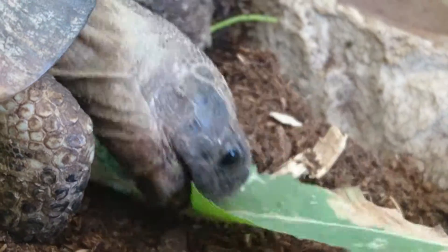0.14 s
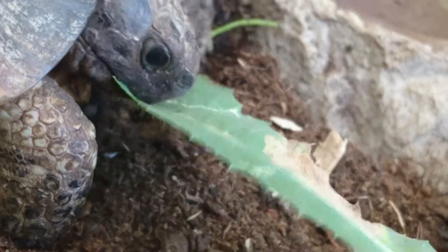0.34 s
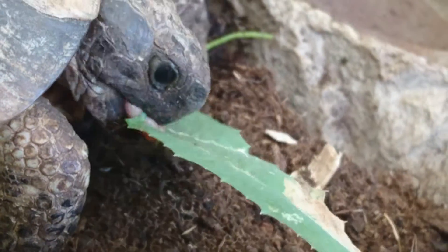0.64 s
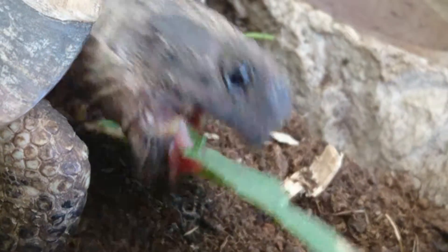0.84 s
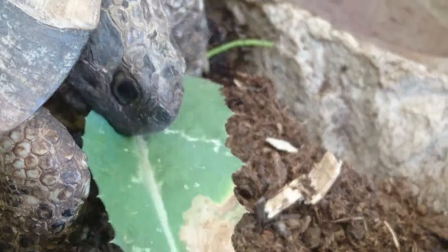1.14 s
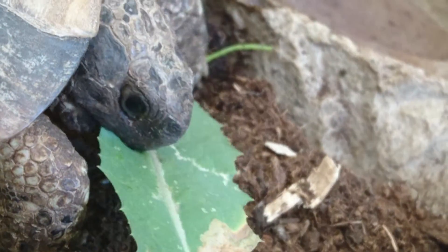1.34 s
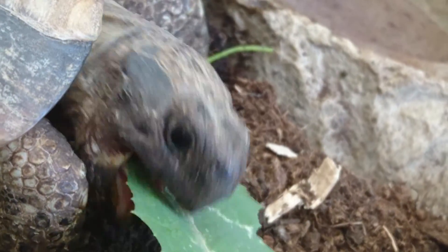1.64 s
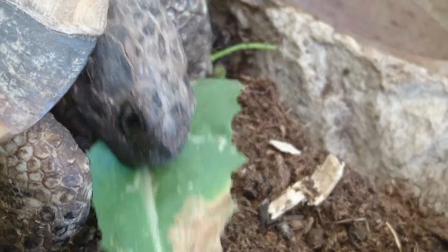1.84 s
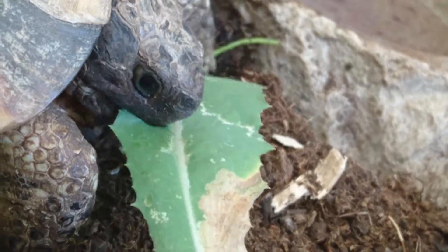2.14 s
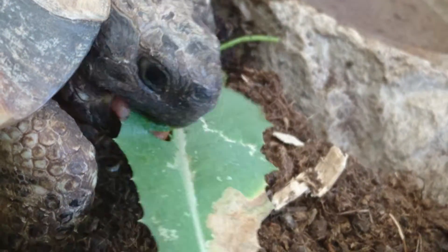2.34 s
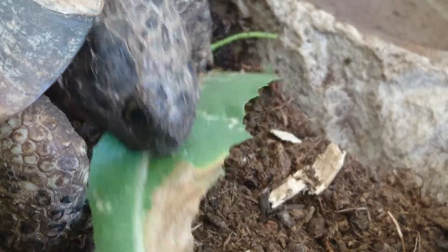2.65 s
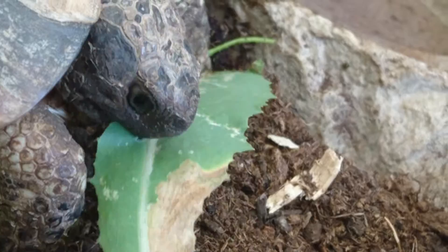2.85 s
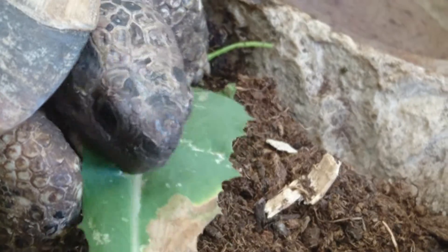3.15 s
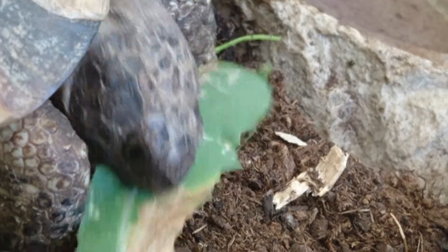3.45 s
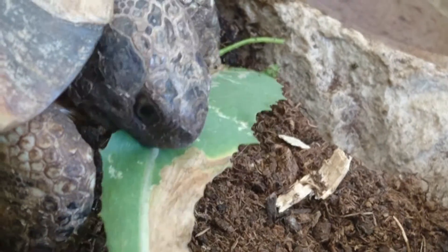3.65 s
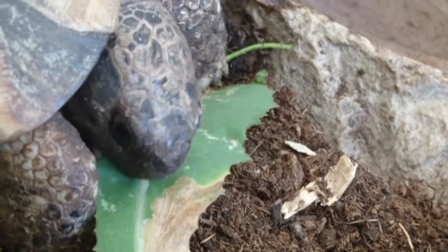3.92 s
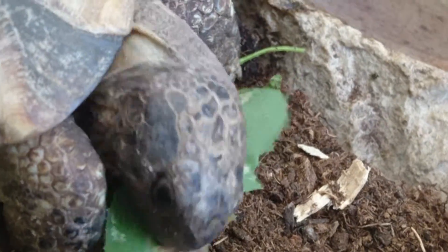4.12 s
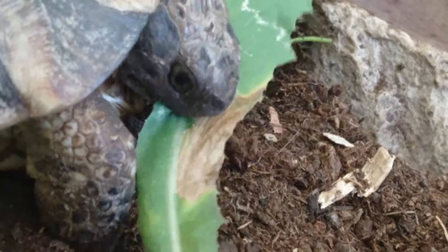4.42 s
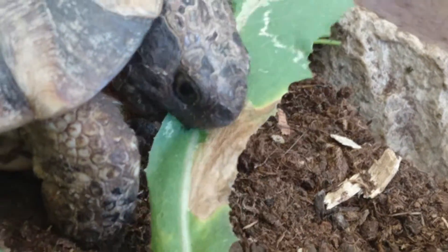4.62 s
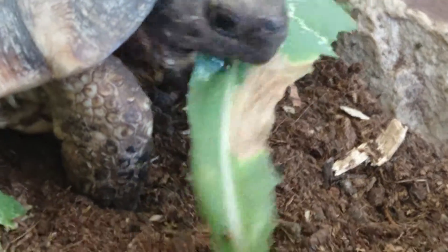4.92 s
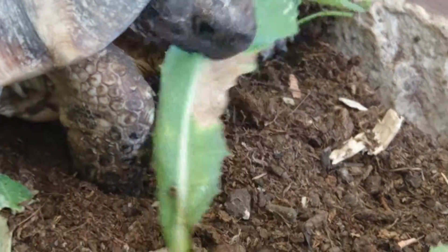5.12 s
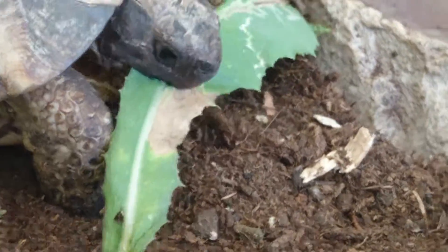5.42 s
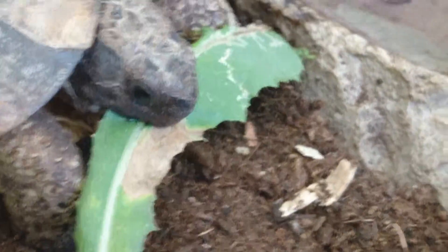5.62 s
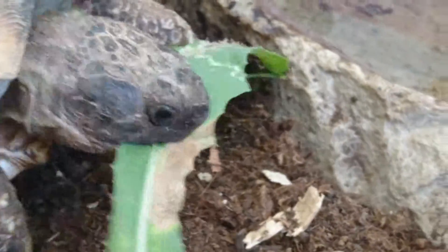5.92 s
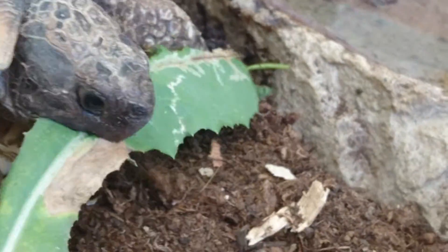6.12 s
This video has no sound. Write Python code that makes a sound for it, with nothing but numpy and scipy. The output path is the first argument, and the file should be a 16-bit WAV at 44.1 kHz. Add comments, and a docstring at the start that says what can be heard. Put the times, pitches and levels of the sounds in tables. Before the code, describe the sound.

A tortoise bites and tears a fresh leaf up close, with crisp sharp snaps and short wet-crisp rips over a soft low rumble.

```python
"""Tortoise eating a leaf

A tortoise bites and tugs at a fresh leaf, close to a small stereo microphone in a quiet room.
Veins snap as sharp clicks with dull jaw knocks; the blade tears as runs of tiny random bursts.
Shaped noise makes the low rumble, drone, hiss and dull scuffs behind it. Sine tones make a hum that
fades, a far engine that rises and sinks, and faint falling bird notes."""
import sys
import numpy as np
from scipy import signal
from scipy.fft import rfft, irfft
from scipy.io import wavfile
from scipy.ndimage import uniform_filter1d

SR = 44100
rng = np.random.default_rng(int(sys.argv[2]) if len(sys.argv) > 2 else 0)


def digitize_waveform(pressure):
    """Quantize a signal to 16-bit integers and store it at the path in sys.argv[1].

    Rows of a 2-D input are taken as channels; values are limited to [-1, 1].
    """
    field = np.atleast_2d(pressure).T
    bounded = np.clip(field, -1, 1)
    quanta = np.round(bounded * 32767).astype(np.int16)
    wavfile.write(sys.argv[1], SR, quanta)


N = 276507
TIME = np.arange(N) / SR  # seconds
HZ = np.fft.rfftfreq(N, 1 / SR)

# Levels here come before the final balance between the sounds; spectrum levels are only relative.
# The veins that break loudest. Each row: start in seconds, level in dB, brightness in dB,
# ring of the stiff piece in Hz, knock of the jaw in dB relative to the level.
VEIN_SNAPS = [(0.1459, -51, 4, 9100, -25), (0.2412, -47.5, 9, 4200, -31), (0.3086, -41.5, 29, 11900, -42),
              (0.7147, -54.5, -7, 5600, -18), (0.9597, -53.5, 18, 9700, -34), (1.062, -44.5, 6, 10000, -41),
              (1.097, -53, 0, 6400, -34), (1.1148, -45, -1, 6200, -37), (1.54, -50.5, 3, 11500, -30),
              (1.8117, -46.5, -6, 4500, -37), (1.8416, -42.5, -3.5, 11300, -26),
              (2.017, -53.5, -10, 9000, -36), (2.3491, -57.5, 5, 9300, -27), (2.625, -47, -4, 9100, -33),
              (2.6507, -45, 1, 9300, -29), (2.6548, -42.5, -4, 9000, -31), (2.7056, -43, -3, 7000, -39),
              (2.921, -52, -3, 5560, -25), (3.0308, -44, -10, 8800, -31), (3.094, -47, -4, 4930, -32),
              (3.282, -47, 1, 4770, -32), (3.4913, -45, 3, 11050, -41), (3.498, -33.5, 0.5, 5900, -48),
              (3.5206, -43, 2, 10700, -25), (3.6062, -44.5, 0, 11500, -45), (3.916, -48.5, -3, 7060, -36),
              (3.9673, -51, -4, 4400, -34), (4.282, -42, 21, 10700, -38), (4.3011, -39.5, 2, 11000, -31),
              (4.313, -36.5, -3, 6300, -31), (4.3678, -42.5, 3, 7500, -42), (5.0916, -41.5, 21, 10100, -41),
              (5.1413, -46, 11, 8850, -36), (5.1946, -27.5, 7, 5780, -29), (5.2108, -43, -2, 10100, -24),
              (5.2559, -41.5, 4, 6700, -26), (5.27, -47.5, -1, 9700, -39), (6.004, -44, 0, 3600, -20.5),
              (6.0224, -47, 7, 8800, -32), (6.0424, -44.5, 2, 4756, -21), (6.094, -51.5, 3, 8450, -31),
              (6.238, -50.5, -1, 12680, -35)]
# Pulls of the jaw that tear or rub the blade. Each row: start in seconds, length in seconds,
# level in dB, brightness in dB, ring of the taut piece in Hz.
BLADE_TEARS = [(0.073, 0.071, -62, -4, 4850), (0.226, .125, -56, -3.5, 3900), (0.713, .014, -62, 1, 5600),
               (0.779, 0.011, -60, -4, 6800), (1.056, 0.0073, -52.5, -5, 10200),
               (1.116, 0.046, -57.5, -7, 5850), (1.81, 0.024, -59, -4, 11400),
               (1.911, 0.02, -52, -5, 11600), (2.654, 0.016, -49, -1, 9050),
               (2.712, 0.032, -51.5, -5, 6200), (3.013, 0.11, -61.5, -8, 4370),
               (3.124, 0.13, -59, -2, 9500), (3.478, 0.093, -49, 0, 10900), (3.903, .016, -60.5, -13, 7100),
               (3.967, 0.03, -53, -2, 6140), (4.032, 0.069, -65.5, -11, 6540),
               (4.281, .06, -50.5, -2.5, 10800), (4.35, 0.075, -53.5, -4, 11400),
               (4.777, 0.042, -64.5, -17, 3540), (5.081, 0.11, -53.5, 4, 9360),
               (5.187, 0.031, -51, -1, 5460), (5.24, 0.032, -58.5, -6, 9200),
               (5.307, 0.082, -63.5, -5, 9250), (5.992, 0.018, -50, -3, 8800), (6.09, 0.038, -56, -1, 8400)]
# Sound colour of the leaf. Each row: frequency in Hz, level in dB per Hz.
LEAF_SPECTRUM = [(300, -33.5), (1200, -24.5), (2200, -14.5), (2900, -15.5), (3500, -9), (4600, -4),
                 (6000, -3), (7700, -4.5), (8800, 3), (10700, -6), (11700, -4.5), (13000, -3), (16000, -8)]
# Sound colour of the jaw. Each row: frequency in Hz, level in dB per Hz.
JAW_SPECTRUM = [(200, -10), (600, -17), (900, -3.5), (1400, -0.5), (2200, -7), (4000, -34), (16000, -22)]
# Faint dull scuffs. Each row: start in seconds, length in seconds, rough centre in Hz, level in dB.
SCUFF_EVENTS = [(0.71, 0.15, 830, -79), (2.383, .13, 620, -73), (2.861, 0.097, 560, -70),
                (3.53, 0.038, 1120, -76), (4.638, 0.043, 1800, -76), (5.725, 0.017, 2046, -74)]
# Bird notes. Each row: start in seconds, length in seconds, starting pitch in Hz, level in dB.
BIRD_NOTES = [(1.39, 0.093, 3190, -84), (1.77, 0.089, 3430, -79), (1.947, 0.052, 3260, -83),
              (2.135, 0.13, 3430, -81), (2.33, 0.027, 3900, -76)]
# Far engine revving up and running down. Each row: time in seconds, firing rate in Hz, level in dB.
ENGINE_COURSE = [(4.33, 46, -81), (4.48, 50.4, -63), (4.62, 56, -48), (4.76, 60.58, -66.5),
                 (5.08, 63.4, -60), (5.22, 61.93, -61.5), (5.33, 59.7, -51), (5.62, 51.41, -49),
                 (5.78, 47.14, -52.5), (6.02, 39.5, -52.5), (6.27, 38.95, -51)]
# Sound colour of the rumble. Each row: frequency in Hz, level in dB per Hz.
RUMBLE_SPECTRUM = [(20, -66), (36, -20), (48, -4), (60, 2), (76, 1.5), (92, -15.5), (125, -17.5),
                   (300, -65.5), (16000, -100)]
# Slow swell of the rumble. Each row: time in seconds, level in dB.
RUMBLE_SWELL = [(0, -46.5), (.5, -50.5), (1.1, -58), (2.1, -59), (2.8, -52), (3.6, -56.5), (4.2, -52),
                (4.9, -50), (6.27, -48)]
# Sound colour of the room's low drone. Each row: frequency in Hz, level in dB per Hz.
DRONE_SPECTRUM = [(40, -38), (90, 7), (150, 1.5), (210, -4), (285, -3), (370, -10.5), (520, -15),
                  (700, -21), (1000, -38.5), (2000, -41), (16000, -92)]
# Sound colour of the hiss. Each row: frequency in Hz, level in dB per Hz.
HISS_SPECTRUM = [(350, -51), (700, -1), (1100, -6), (2500, -5), (3300, -3.5), (5200, -0.5), (6500, -2),
                 (7900, -9), (8700, -3.5), (9200, 0.5), (9550, -3.5), (10100, -4.5), (11200, -8.5),
                 (16000, -11.5)]
# Level of a machine's hum. Each row: time in seconds, level in dB.
HUM_LEVEL = [(0, -62.5), (.45, -74), (.85, -65), (1.5, -60), (2.15, -68.5), (2.5, -63.5), (3.0, -77)]
# How alike the noise is left and right. Each row: frequency in Hz, likeness from 0 to 1.
LEFT_RIGHT_LIKENESS = [(30, 1), (110, 0.75), (200, 0.84), (350, 0.62), (700, 0.18), (2000, 0.02), (5000, 0),
                       (16000, 0)]

# every pull: a quiet crackle as the blade strains, a loud one as it tears, a quiet one as it goes slack
STRAIN_SHARE, STRAIN_DB = 0.8, -10  # length as a share of the tear; level just before it gives
SLACK_SHARE, SLACK_DB = 0.96, -11.5  # length as a share of the tear; level just after it
REST_DB, EASE_DB = -17.5, 2.5  # level at the outer ends; drop from the start of the tear to its end
GIVE_S, STOP_S = 0.0038, 0.0066  # how fast a tear starts and stops, in seconds
LEAF_LEAD_S = 0.00018  # how much sooner leaf sounds reach the left, in seconds
CLICK_SIZE = 110  # samples over which the level of a click or knock is reckoned
BIRD_FALL = 0.06  # share of its pitch by which every note falls
# the room booms when the firing rate passes its resonance
BOOM_HZ, BOOM_WIDTH_HZ, BOOM_DB, FUNDAMENTAL_DB = 56, 20.5, 18, -9.5
DRONE_DB, DRONE_FOLLOWS = -61.5, 0.37  # mean level; share of the rumble's swell that it takes on
EDGE_HZ = 16000  # upper band limit


def snaps():
    """A vein stores strain and lets it go at once: one sharp click with the ring of the stiff piece."""
    out = np.zeros((2, N))
    for start, db, bright_db, ring_hz, _ in VEIN_SNAPS:
        paths = ports(scatter=0.9, ring_s=0.0011, lead_s=LEAF_LEAD_S)
        click = pulse(LEAF_SPECTRUM, bright_db, ring_hz, ring_db=10.0)
        snap = signal.fftconvolve(click[None], paths, axes=1)
        add(out, start, gain_of(db) * np.sqrt(CLICK_SIZE) * snap)
    return out


def knocks():
    """The horny jaw jolts as a vein gives way: a short dull knock under the click."""
    out = np.zeros((2, N))
    for start, db, _, _, knock_db in VEIN_SNAPS:
        paths = ports(scatter=0.94, ring_s=0.0099, lead_s=0.000096)
        knock = signal.fftconvolve(pulse(JAW_SPECTRUM)[None], paths, axes=1)
        add(out, start, gain_of(db + knock_db) * np.sqrt(CLICK_SIZE) * knock)
    return out


def pull(length):
    """Times in seconds from the moment the blade gives, and the gain through strain, tear and slack."""
    before = GIVE_S + STRAIN_SHARE * length
    after = STOP_S + SLACK_SHARE * length
    t = np.arange(-before, length + after, 1 / SR)
    stages_s = [-before, 0, GIVE_S, length, length + STOP_S, length + after]
    stages_db = [REST_DB, STRAIN_DB, EASE_DB / 2, -EASE_DB / 2, SLACK_DB, REST_DB]
    return t, gain_of(np.interp(t, stages_s, stages_db))


def cell_bursts(cells_per_s=1400, spread_db=2.4, clump_db=2.4, fibre_share=0.025, fibre_db=7, count=8):
    """Cells burst in uneven clumps from count spots; a few are louder because they are tougher fibres."""
    spread = spread_db * np.minimum(rng.exponential(1, N), 3.3)
    sizes = gain_of(spread + clump_db * drift(66))
    bursts = sizes * rng.choice([-1, 1], N) * (rng.random(N) < cells_per_s / SR)
    bursts *= gain_of(fibre_db * (rng.random(N) < fibre_share))
    spot = rng.integers(0, count, N)
    crackle = np.zeros((2, 1))
    for k in range(count):
        paths = ports(scatter=0.95, ring_s=0.0015, lead_s=LEAF_LEAD_S)
        crackle = crackle + signal.oaconvolve((bursts * (spot == k))[None], paths, axes=1)
    return crackle


def tears(jaw_db=-29):
    """Each tear is a run of bursting cells, coloured by the taut leaf and a dull crunch of the jaw."""
    crackle = cell_bursts()
    out = np.zeros((2, N))
    for start, length, db, bright_db, ring_hz in BLADE_TEARS:
        t, effort = pull(length)
        places = round((start + t[0]) * SR) + np.arange(len(t))
        run = gain_of(db) * effort * evened(crackle.take(places, axis=1, mode="wrap"))
        colour = pulse(LEAF_SPECTRUM, bright_db, ring_hz, ring_db=5.0)
        colour = colour + gain_of(jaw_db) * pulse(JAW_SPECTRUM)
        add(out, start + t[0], signal.fftconvolve(run, colour[None], axes=1))
    return out


def ticks(per_s=3, db=-59, spread_db=2):
    """Faint stray ticks at random times throughout."""
    sizes = gain_of(db + spread_db * np.minimum(rng.exponential(1, N), 3))
    sizes *= rng.random(N) < per_s / SR
    paths = ports(scatter=1.0, ring_s=0.0015, lead_s=LEAF_LEAD_S)
    click = signal.fftconvolve(pulse(LEAF_SPECTRUM)[None], paths, axes=1)
    return np.sqrt(CLICK_SIZE) * signal.oaconvolve(sizes[None], click, axes=1)[:, :N]


def scuffs(grain_db=4, room_db=-4):
    """Dull, grainy scrapes of band-limited noise, as of a foot or the shell shifting on the soil."""
    out = np.zeros((2, N))
    grit = rng.standard_normal(N) * gain_of(grain_db * drift(130))
    for start, length, hz, db in SCUFF_EVENTS:
        band = signal.butter(2, [hz / 1.5, hz * 1.3], "band", fs=SR)
        noise = signal.lfilter(*band, grit[round(start * SR):round((start + length) * SR)])
        add(out, start, gain_of(db) * evened(noise) * signal.windows.tukey(len(noise), 0.6))
    return out + gain_of(room_db) * room(out)


def birds(room_db=-2):
    """Thin far-off notes: sine tones whose pitch falls steadily."""
    out = np.zeros((2, N))
    for start, length, first_hz, db in BIRD_NOTES:
        hz = first_hz * np.linspace(1, 1 - BIRD_FALL, round(length * SR))
        note = np.sqrt(2) * np.sin(2 * np.pi * np.cumsum(hz) / SR)
        add(out, start, gain_of(db) * note * signal.windows.tukey(len(hz), 0.6))
    return out + gain_of(room_db) * room(out, t60=0.26)


def engine(rough=0.11):
    """Only the lowest two firing harmonics come through the walls; the lower one sets the room booming."""
    hz, db = curves(ENGINE_COURSE)
    boom_db = BOOM_DB / (1 + (2 * (hz - BOOM_HZ) / BOOM_WIDTH_HZ) ** 4)
    turn = 2 * np.pi * np.cumsum(hz * (1 + 0.013 * drift(12.5))) / SR
    tone = np.zeros(N)
    for harmonic, lift_db in [(1, FUNDAMENTAL_DB + boom_db), (2, 0)]:
        tone += gain_of(db + lift_db) * np.sin(harmonic * turn) * (1 + rough * drift(14))
    return np.sqrt(2) * tone


def rumble():
    """Deep noise through the walls, evened out so that its level mainly follows the swell table."""
    noise = air(RUMBLE_SPECTRUM)
    power = uniform_filter1d(noise[0] ** 2, size=SR // 8)
    return noise / np.sqrt(power) * gain_of(curves(RUMBLE_SWELL)[0])


def drone():
    """The room's low noise, which swells a little with the rumble."""
    swell_db = curves(RUMBLE_SWELL)[0]
    return air(DRONE_SPECTRUM) * gain_of(DRONE_DB + DRONE_FOLLOWS * (swell_db - swell_db.mean()))


def hum(centre_hz=137.0):
    """A machine's hum: one sine tone that wavers slightly in pitch and level."""
    tone = np.sqrt(2) * np.sin(2 * np.pi * np.cumsum(centre_hz + 0.5 * drift(2)) / SR)
    return tone * gain_of(curves(HUM_LEVEL)[0] + 1.3 * drift(1.3))


def hiss():
    """Soft high noise whose level wanders slightly."""
    return air(HISS_SPECTRUM) * gain_of(-67.5 + 0.54 * drift(2.9))


def background():
    """The drone, hum and hiss together, each a little louder on the right."""
    return panned(drone() + hum(), right_db=4.5) + panned(hiss(), right_db=3)


def air(spectrum):
    """Steady noise, alike on both sides in the bass and unrelated in the treble."""
    a, b = rfft(rng.standard_normal((2, N)))
    same = np.clip(read(LEFT_RIGHT_LIKENESS, HZ), -1, 1)
    pair = np.array([a, same * a + np.sqrt(1 - same ** 2) * b])
    return evened(irfft(pair * gain_of(read(spectrum, HZ)), N))


def pulse(spectrum, bright_db=0, ring_hz=1, ring_db=0, size=512):
    """A click of energy 1; brightness tips the balance about 7800 Hz, and one resonance stands out."""
    hz = abs(np.fft.fftfreq(size, 1 / SR))
    tilt_db = bright_db / 2 * np.tanh(2 * np.log2((hz + 1) / 7800))
    peak_db = ring_db / (1 + ((hz - ring_hz) / 450) ** 2)
    log_gain = np.log(gain_of(read(spectrum, hz) + tilt_db + peak_db))
    # these phases pack the energy at the start, so nothing sounds before the click
    click = np.fft.ifft(np.exp(np.conj(signal.hilbert(log_gain)))).real
    return click / np.linalg.norm(click)


def ports(scatter, ring_s, lead_s, size=400):
    """Paths to the two microphone ports: left first; shell, stone and soil scatter the sound."""
    t = np.arange(size) / SR
    delay = np.array([[0], [lead_s]])
    paths = rng.standard_normal((2, size)) * np.exp(-t / ring_s) * (t > delay + 0.0002)
    paths *= scatter / np.linalg.norm(paths, axis=1, keepdims=True)
    # the direct sound
    paths[0, 0] += 1
    paths[1, round(lead_s * SR)] += 1
    return paths / np.sqrt(1 + scatter ** 2)


def room(x, t60=0.085):
    """A thin diffuse tail, different on each side, that falls by 60 dB in t60 seconds."""
    t = np.arange(SR // 2) / SR
    tail = rng.standard_normal((2, len(t))) * gain_of(-60 * t / t60) * np.minimum(1, t / 0.00095)
    return signal.oaconvolve(x, tail / np.linalg.norm(tail[0]), axes=1)[:, :N]


def drift(rate_hz):
    """Slow random wandering, scaled to rms 1."""
    return evened(irfft(rfft(rng.standard_normal(N)) / (1 + (HZ / rate_hz) ** 4), N))


def gain_of(db):
    """Turns decibels into amplitude."""
    return 10 ** (np.asarray(db) / 20)


def evened(x):
    """Scales to rms 1."""
    return x / np.sqrt(np.mean(x ** 2) + 1e-20)


def read(points, hz):
    """Reads a spectrum table on a log-frequency axis."""
    f, value = np.transpose(points)
    return np.interp(np.log(hz + 1), np.log(f + 1), value)


def curves(rows):
    """Gives the columns of a time table, sample by sample."""
    s, *columns = np.transpose(rows)
    return [np.interp(TIME, s, c) for c in columns]


def add(mix, start, sound):
    """Mixes a sound in at a start time in seconds."""
    part = mix[..., max(round(start * SR), 0):][..., :sound.shape[-1]]
    part += sound[..., :part.shape[-1]]


def panned(x, right_db):
    """Tips the balance to the right."""
    return x * gain_of([[-right_db / 2], [right_db / 2]])


def scene(room_db=-10, knock_db=5.0):
    """The leaf close by, the rest far behind it."""
    leaf = gain_of(-3) * (snaps() + ticks()) + gain_of(-2) * tears()
    leaf = panned(leaf, right_db=4.3)
    eating = leaf + gain_of(room_db) * room(leaf) + gain_of(knock_db) * knocks()
    deep = panned(rumble() + engine(), right_db=3.4)
    return eating + scuffs() + birds() + deep + background()


def record(dry):
    """The recorder's band limit: a steep filter takes away what lies above EDGE_HZ."""
    low_pass = signal.firwin(401, EDGE_HZ, window=("kaiser", 9), fs=SR)
    return signal.oaconvolve(dry, low_pass[None], "same")


dry = scene()
out = record(dry)
digitize_waveform(out)
```